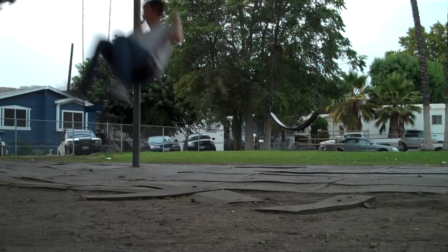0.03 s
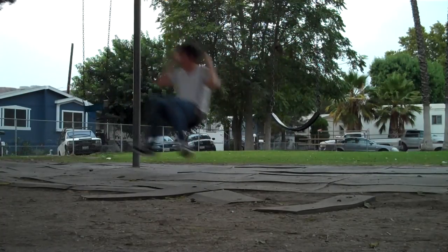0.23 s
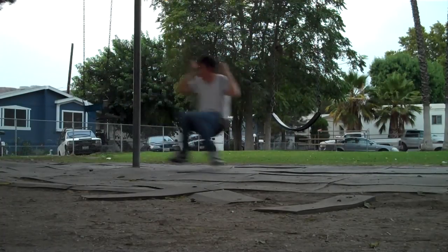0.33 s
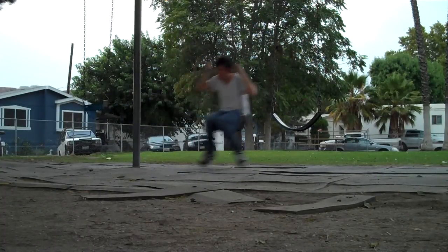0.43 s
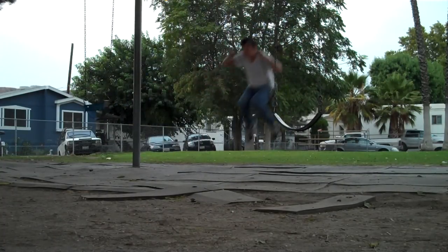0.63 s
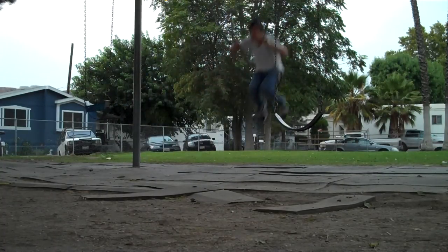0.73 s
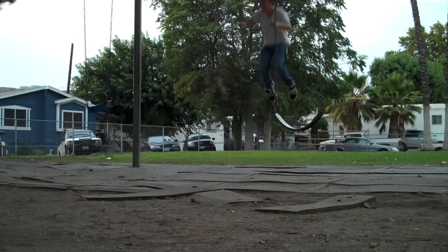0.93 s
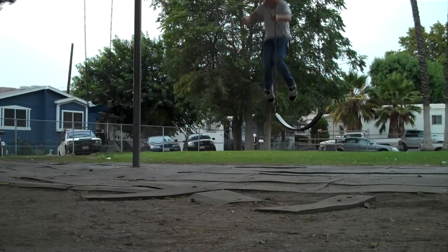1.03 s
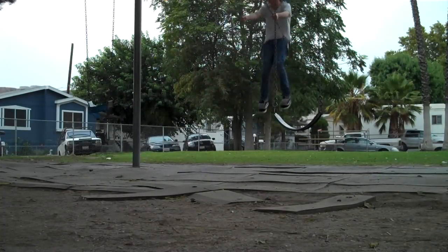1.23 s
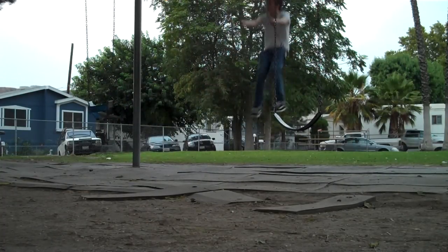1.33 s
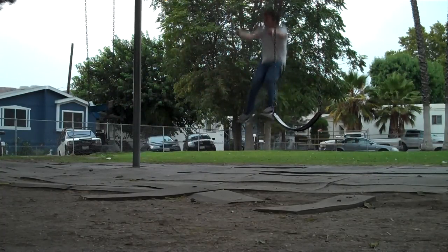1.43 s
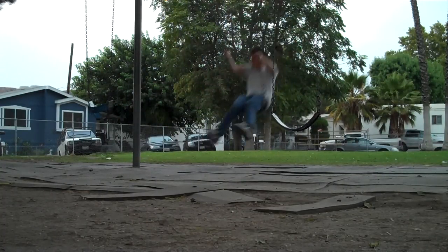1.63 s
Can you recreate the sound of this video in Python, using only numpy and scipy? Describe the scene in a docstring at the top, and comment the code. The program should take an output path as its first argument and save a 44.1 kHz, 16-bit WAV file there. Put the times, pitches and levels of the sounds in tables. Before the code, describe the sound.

A dry metal playground swing squeaks in high, piercing chirps and one long squeal outdoors

```python
"""A park: a metal playground swing, with distant traffic humming behind it.
Its dry hanger sticks and slips on the pin and sings in near-pure tones around 5 kHz: one long squeal as the
rider passes the bottom of the arc, and short squeaks before, during and after it, made as wavering phasors.
The chain ticks in bright noise bursts and clothes rustle as a soft noise swell; houses and trees send the
squeaks back as decaying noise responses. Traffic is shaped noise with a few wavering engine lines."""
import sys
import numpy as np
from scipy import signal
from scipy.fft import rfft, irfft
from scipy.io import wavfile
from scipy.ndimage import uniform_filter1d

SR = 44100
rng = np.random.default_rng(int(sys.argv[2]) if len(sys.argv) > 2 else 0)


def store_wav(level_fs):
    """Save 16-bit WAV to argv[1]."""
    pcm = np.round(np.clip(np.atleast_2d(level_fs), -1, 1) * 32767)
    wavfile.write(sys.argv[1], SR, pcm.T.astype(np.int16))


N = 74970
T = np.arange(N) / SR   # s


def from_db(db):
    """Decibels to amplitude gain."""
    return 10 ** (np.asarray(db) / 20)


def rms_one(x):
    """Scale to rms 1."""
    return x / np.sqrt(np.mean(x ** 2) + 1e-20)


def pan(db):
    """Left and right gains for a left-minus-right level difference."""
    return from_db(np.array([[.5], [-.5]]) * db)


def colour(x, points):
    """Filter by an EQ curve of (f/Hz, level/dB) points joined on a log-frequency axis."""
    hz, db = np.transpose(points)
    bins = np.maximum(np.fft.rfftfreq(N, 1 / SR), 1)
    gain = from_db(np.interp(np.log(bins), np.log(hz), db))
    return irfft(rfft(x) * gain, N)


def noise(points):
    """Coloured noise at rms 1, unrelated in the two channels."""
    return rms_one(colour(rng.standard_normal((2, N)), points))


def drift(rate_hz):
    """Slow random modulation with rms 1, rolling off above the given rate."""
    bins = np.fft.rfftfreq(N, 1 / SR)
    return rms_one(irfft(rfft(rng.standard_normal(N)) / (1 + (bins / rate_hz) ** 2), N))


# spectrum of distant traffic and leaves: f/Hz, relative level/dB per Hz
TOWN_SPECTRUM = [(15, -37), (25, -17), (38, -16), (96, -5), (126, -10), (155, -4.5), (187, -11),
                 (237, -7.5), (278, -9.5), (403, -10), (436, -11), (1020, -11), (1510, -18.5),
                 (4850, -31.5), (7420, -32), (10200, -47), (14000, -44)]
# stereo width of that wash: f/Hz, side-minus-mid level/dB
TOWN_WIDTH = [(30, -10), (70, -13.5), (250, -18), (700, -17), (1400, -7), (2800, -6), (6000, 5.5),
              (12000, 0.5)]
# stereo balance of that wash: f/Hz, left-minus-right level/dB
TOWN_BALANCE = [(60, -4.5), (110, -2), (200, -1.5), (370, -0.5), (690, -0.5), (1270, -0.5), (2330, 0.5),
                (4280, -1), (7880, 5.5), (14500, -1)]
# far engine lines: f/Hz, level at start/dB, level at end/dB
ENGINE_LINES = [(111.6, -45.5, -59.5), (155, -52, -50.5), (178.3, -53, -60.5), (407.5, -58.5, -60)]
TOWN_DB = -43
HUM_WAVER_HZ, HUM_WAVER_RATE_HZ = 3.07, 6.63   # pitch wander, rms depth and rate


def town():
    """Far traffic and leaves blend into a steady wash, wider in the treble; engines add wavering lines."""
    mid, side = noise(TOWN_SPECTRUM)
    side = colour(side, TOWN_WIDTH)
    left_eq = [(hz, db / 2) for hz, db in TOWN_BALANCE]
    right_eq = [(hz, -db / 2) for hz, db in TOWN_BALANCE]
    wash = np.array([colour(mid + side, left_eq), colour(mid - side, right_eq)])
    hum = np.zeros(N)
    for hz, first_db, last_db in ENGINE_LINES:
        pitch = hz + HUM_WAVER_HZ * drift(HUM_WAVER_RATE_HZ)
        level = from_db(np.linspace(first_db, last_db, N))
        hum += np.sqrt(2) * level * np.sin(2 * np.pi * np.cumsum(pitch) / SR)
    return from_db(TOWN_DB) * wash + hum


# spectrum of rustling clothes: f/Hz, relative level/dB
RUSTLE_SPECTRUM = [(800, -27), (1700, 8), (3200, 3), (4500, -18), (9000, -33)]
RUSTLE_S, RUSTLE_WIDTH_S, RUSTLE_DB = .475, .035, -48


def rider():
    """Clothes rustle softly in the rush of the pass: noise under one bell-shaped swell."""
    swell = np.exp(-((T - RUSTLE_S) / RUSTLE_WIDTH_S) ** 2)
    return from_db(RUSTLE_DB) * swell * noise(RUSTLE_SPECTRUM)


EARLY_DB, EARLY_T60_S = -12, 0.17
LATE_DB, LATE_T60_S = -16.5, 0.87
ECHO_DELAY_S = .014   # gap before either reverb


def echoes(x, level_db, t60):
    """Scatter from the frame, trees and houses: dense reflections that die away, different at each ear."""
    decay = (T > ECHO_DELAY_S) * from_db(-60 * T / t60)
    response = rng.standard_normal((2, N)) * decay / np.sqrt(np.sum(decay ** 2))
    return from_db(level_db) * signal.fftconvolve(x, response, axes=1)[:, :N]


# when the chain links tick: t/s, level/dB
TICK_TIMES = [(.576, -38.5), (0.91, -56), (1.046, -47)]
# spectrum of a tick: f/Hz, relative level/dB
TICK_SPECTRUM = [(1000, -7), (3500, -2), (5500, 3), (8300, -3), (11000, -14.5), (14000, -27)]
TICK_DECAY_S, TICK_PAN_DB = 0.0025, 7


def chain():
    """Links settle with short bright ticks: noise struck on at once and fading exponentially."""
    level = np.zeros(N)
    for start, db in TICK_TIMES:
        level += from_db(db) * (T >= start) * np.exp(-np.abs(T - start) / TICK_DECAY_S)
    return pan(TICK_PAN_DB) * level * noise(TICK_SPECTRUM)


# spectrum of the rubbing noise under the tones: f/Hz, relative level/dB
RASP_SPECTRUM = [(2500, -24), (4000, -19.5), (5200, -5.5), (6200, 11), (7500, 4.5), (9000, -34),
                 (11000, -13.5), (14000, -33.5)]


def rubbing():
    """Dry metal surfaces rub with a coloured hiss."""
    return noise(RASP_SPECTRUM)


FLUTTER_RATE_HZ = 130
WAVER_HZ, WAVER_RATE_HZ = 6.73, 82   # pitch waver, rms depth and rate


def slip(hz, rough):
    """Stick-slip oscillation as a rotating phasor, wavering in pitch and fluttering with roughness."""
    phase = 2 * np.pi * np.cumsum(hz + WAVER_HZ * drift(WAVER_RATE_HZ)) / SR
    flutter = 1 + rough * (drift(FLUTTER_RATE_HZ) + 1j * drift(FLUTTER_RATE_HZ))
    return np.sqrt(2) * flutter * np.exp(1j * phase), phase


OVERTONE_PAN_DB = 12.5   # overtones lie to the left


def octave(tone):
    """Squaring the phasor doubles its pitch; its real part is scaled back to about rms 1."""
    return (tone ** 2).real / np.sqrt(2)


# short squeaks: start t/s, length t/s, attack t/s, release t/s, pitch f/Hz, scoop from below f/Hz
# (negative: from above), level/dB, sag/dB (negative: rise), roughness [ratio],
# octave level/dB and rasp level/dB relative to the squeak, left-minus-right level/dB
SHORT_SQUEAKS = [ (0.02, 0.076, 0.04, 0.015, 5488, 20, -28, 3.5, 0.08, -53, -38, -5.5),
                 (0.139, .062, .040, .005, 5464, 4.5, -42.5, 0, .05, -44, -21, -5),
                 (0.197, 0.011, 0.0031, 0.0057, 5280, 10, -23, 8.5, 0.15, -32, -35, -16.5),
                 (0.204, 0.047, 0.029, .006, 5559, 15.5, -17, -3, 0, -37.5, -39, -4),
                 (.243, .016, .005, .006, 5410, 5.5, -22, -1.5, 0.1, -30, -36, -4),
                 (0.238, 0.081, .010, .025, 5643, 22.5, -32.5, 14.5, 0, -13, -38, -17.5),
                 (0.393, 0.06, 0.063, 0.0089, 7315, -24, -41.5, -3.5, 0.03, -51, -40, 19),
                 (0.682, 0.026, 0.01, 0.0037, 5503, 13, -23.5, 20.5, 0.07, -30, -17, -19.5),
                 (0.691, 0.023, 0.0087, .005, 5423, 1, -31, -0.5, 0.33, -32, -21, -3.5),
                 (0.786, 0.0091, .008, 0.0077, 4835, 19, -39.5, 6.5, 0.31, -21, -8, 15),
                 (.792, 0.012, 0.0087, 0.0085, 5026, 38.5, -20, 3.5, 0.2, -23.5, -36, -4.5),
                 (1.041, 0.013, 0.0037, .005, 6430, 21, -52.5, -1.5, 0.2, -30, -22, -3)]
SCOOP_S = 0.0068
RING_DB, RING_DECAY_S = -7.5, 0.036   # the frame rings on after each squeak


def squeaks():
    """Brief slips swell, glide onto pitch, sag or rise and ring out; returns tones and edge (octave, rasp)."""
    tones = np.zeros((2, N), complex)
    edge = np.zeros((2, N))
    rasp = rubbing()
    for (start, length, attack, release, hz, scoop_hz, db, sag_db,
         rough, octave_db, rasp_db, pan_db) in SHORT_SQUEAKS:
        age = np.maximum(T - start, 0)
        since_end = np.maximum(age - length, 0)
        swell = np.sin(np.pi / 2 * np.minimum(age / attack, 1)) ** 2
        held = swell * from_db(db - sag_db * np.minimum(age / length, 1))
        level = held * np.exp(-since_end / release)
        ring = held * from_db(RING_DB) * np.exp(-since_end / RING_DECAY_S)
        tone, _ = slip(hz - scoop_hz * np.exp(-age / SCOOP_S), rough)
        tones += pan(pan_db) * np.maximum(level, ring) * tone
        overtone = pan(OVERTONE_PAN_DB) * from_db(octave_db) * octave(tone)
        edge += level * (overtone + from_db(rasp_db) * rasp)
    return tones, edge


# level envelope of the long squeal and its ring-out: t/s, level/dB
SQUEAL_ENVELOPE = [(0.1988, -33.5), (.202, -11.5), (.208, -14), (.225, -8), (.25, -10), (.305, -13.5),
                   (.332, -12.5), (.358, -13), (.385, -22), (.415, -27.5), (.45, -29.5), (.51, -43.5),
                   (0.599, -51)]
LEVEL_SMOOTH_S = .003
SQUEAL_HZ, SQUEAL_SHARP_HZ, SQUEAL_SETTLE_S = 5100, 45.12, 0.017   # starts sharp, settles on the hanger's mode
SQUEAL_ROUGH, CATCH_ROUGH, CATCH_S = 0.0086, 0.19, 0.008   # extra roughness while the slip catches
DOUBLING_S, DOUBLING_WIDTH_S, DOUBLING_DB = 0.356, .03, -30.5   # alternate slips differ
OCTAVE_DB = -34.5
SQUEAL_RASP_DB, SQUEAL_RASP_FADE_S = -44, .04


def squeal():
    """The slip catches roughly, settles to a clean tone and briefly doubles its period; returns tone and edge."""
    times, db = np.transpose(SQUEAL_ENVELOPE)
    age = np.maximum(T - times[0], 0)
    level = np.interp(T, times, from_db(db), left=0, right=0)
    level = uniform_filter1d(level, max(int(LEVEL_SMOOTH_S * SR), 1))
    pitch = SQUEAL_HZ + SQUEAL_SHARP_HZ * np.exp(-age / SQUEAL_SETTLE_S)
    rough = SQUEAL_ROUGH + CATCH_ROUGH * np.exp(-age / CATCH_S)
    tone, phase = slip(pitch, rough)
    doubling_swell = np.exp(-((T - DOUBLING_S) / DOUBLING_WIDTH_S) ** 2)
    doubling = from_db(DOUBLING_DB) * doubling_swell * np.cos(1.5 * phase)   # a line at 1.5 times the pitch
    overtones = from_db(OCTAVE_DB) * octave(tone) + doubling
    rasp = from_db(SQUEAL_RASP_DB) * np.exp(-age / SQUEAL_RASP_FADE_S) * rubbing()
    return level * tone, level * (pan(OVERTONE_PAN_DB) * overtones + rasp)


SUM_TONE_DB = -25
UPPER_SIDE_DB, LOWER_SIDE_DB = -7.5, -25   # mixing gains for side tones of two modes sounding together


def hanger():
    """All tones share one rubbing contact; products of the phasors add sum and side tones where they overlap."""
    long_tone, long_edge = squeal()
    short_tones, short_edge = squeaks()
    second = short_tones.mean(axis=0)
    sum_tones = from_db(SUM_TONE_DB) * (long_tone * second).real
    upper_side = from_db(UPPER_SIDE_DB) * second ** 2 * np.conj(long_tone)
    lower_side = from_db(LOWER_SIDE_DB) * long_tone ** 2 * np.conj(second)
    tones = (long_tone + short_tones + upper_side + lower_side).real
    return tones + pan(OVERTONE_PAN_DB) * sum_tones + long_edge + short_edge


LEFT_LEAD_S = .00003


def right_later(x):
    """The whole mix reaches the right channel slightly later: a delay as a phase slope over frequency."""
    left, right = x
    bins = np.fft.rfftfreq(N, 1 / SR)
    delayed = irfft(rfft(right) * np.exp(-2j * np.pi * bins * LEFT_LEAD_S), N)
    return np.array([left, delayed])


def scene():
    """Town and rider behind the swing and its early and late echoes."""
    swing = hanger() + chain()
    early = echoes(swing, EARLY_DB, EARLY_T60_S)
    late = echoes(swing, LATE_DB, LATE_T60_S)
    return right_later(town() + rider() + early + late + swing)


LIMIT_DB, LIMIT_SHARE, LIMIT_ATTACK_S = -15.5, 0.15, 0.0028   # share of the overshoot that is turned down
OVERSHOOT_FALL_DB_PER_S = 47   # fall of the held overshoot, before the share is applied
CUTOFF_HZ = 14250


def record(dry):
    """Gain control ducks a little under loud sound; a steep low-pass cuts the top."""
    keep = np.exp(-1 / (LIMIT_ATTACK_S * SR))
    power = signal.lfilter([1 - keep], [1, -keep], np.mean(dry ** 2, axis=0))
    level_db = 10 * np.log10(power + 1e-12)
    overshoot_db = np.maximum(level_db - LIMIT_DB, 0)
    # a running maximum on a rising ramp holds each peak and lets it fall at a fixed rate
    fall_db = OVERSHOOT_FALL_DB_PER_S * T
    held_db = np.maximum.accumulate(overshoot_db + fall_db) - fall_db
    ducked = dry * from_db(-LIMIT_SHARE * held_db)
    low_pass = signal.ellip(12, .1, 80, CUTOFF_HZ, fs=SR, output="sos")
    return signal.sosfilt(low_pass, ducked)


dry = scene()
out = record(dry)
store_wav(out)
```